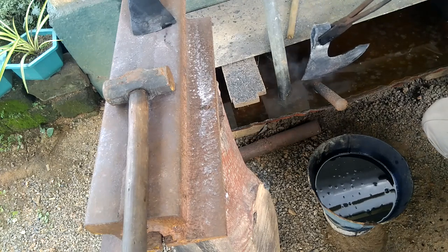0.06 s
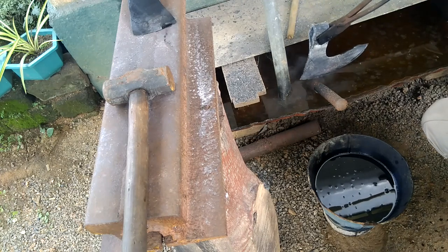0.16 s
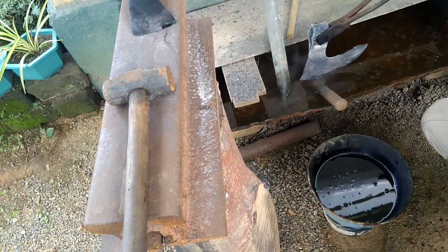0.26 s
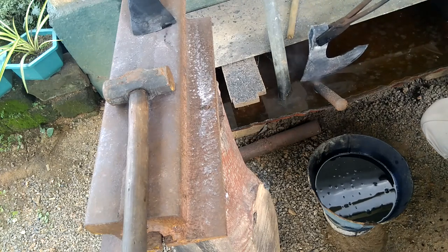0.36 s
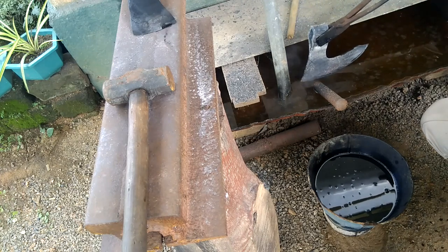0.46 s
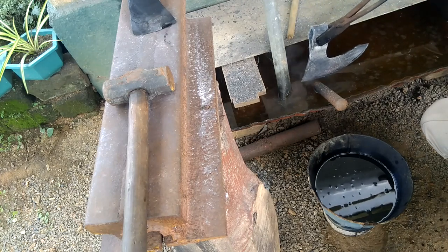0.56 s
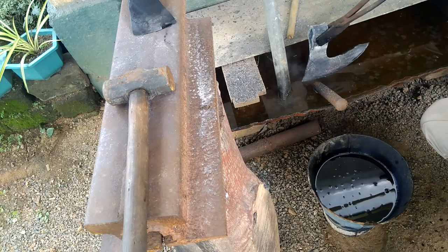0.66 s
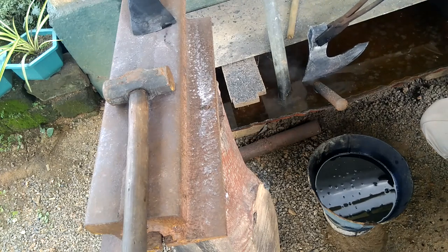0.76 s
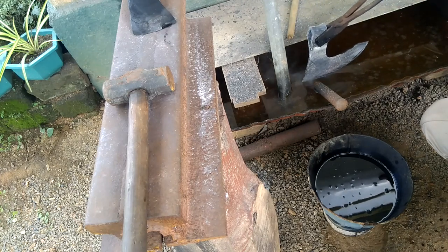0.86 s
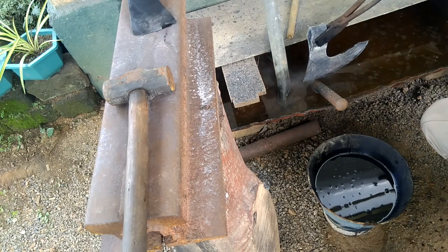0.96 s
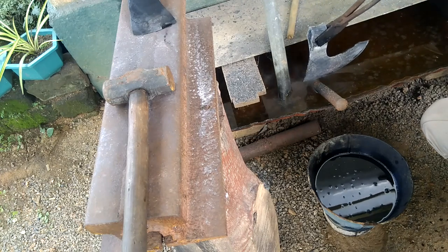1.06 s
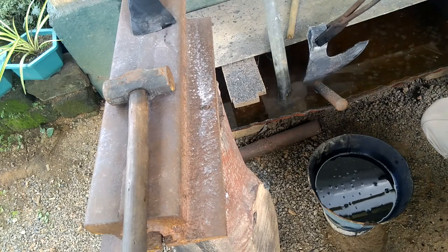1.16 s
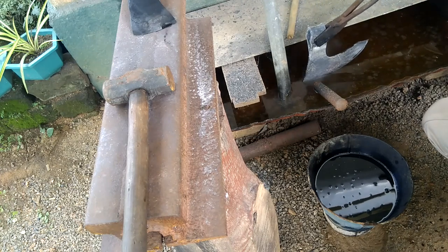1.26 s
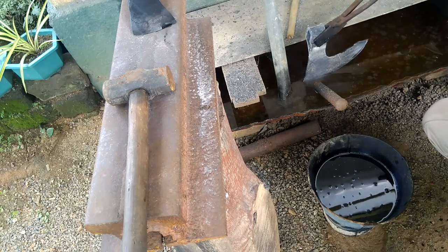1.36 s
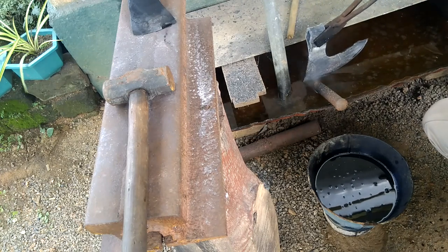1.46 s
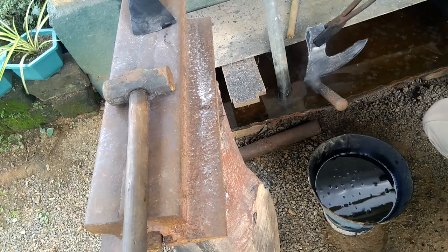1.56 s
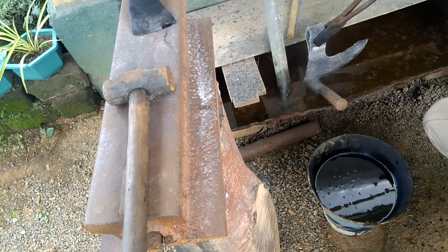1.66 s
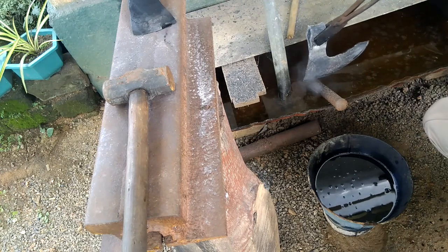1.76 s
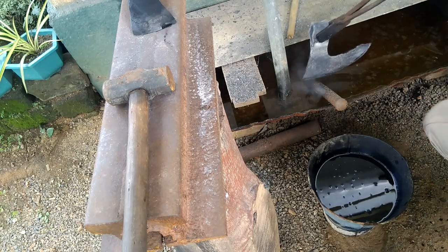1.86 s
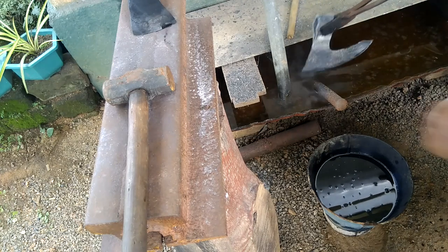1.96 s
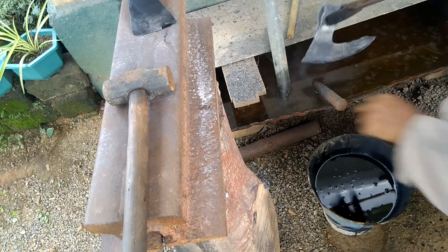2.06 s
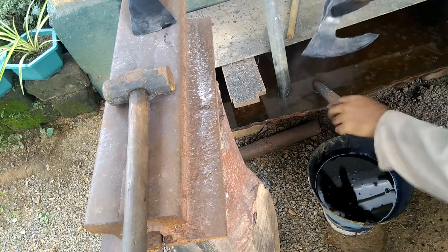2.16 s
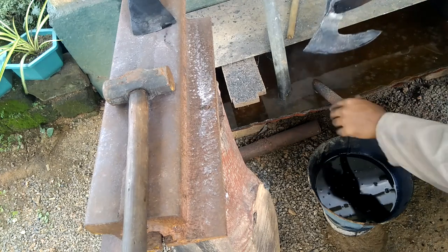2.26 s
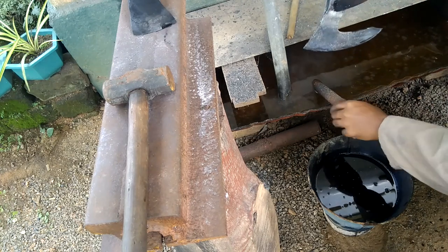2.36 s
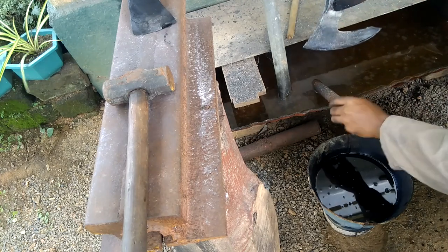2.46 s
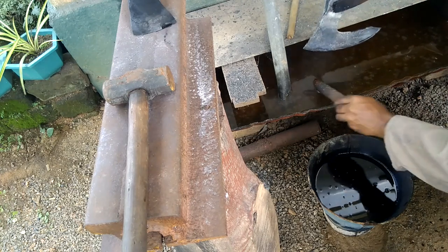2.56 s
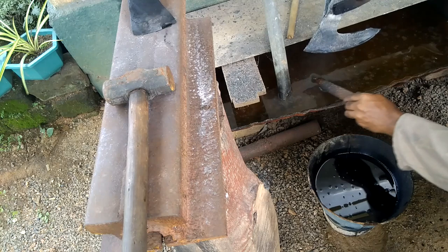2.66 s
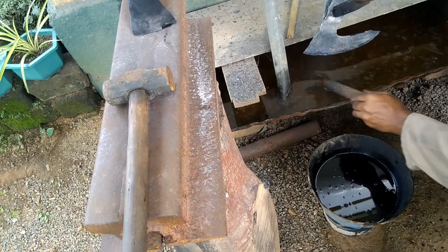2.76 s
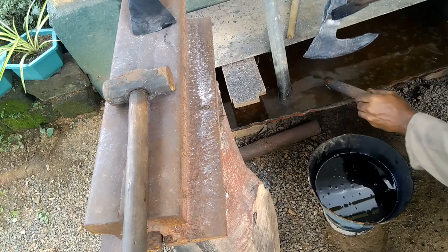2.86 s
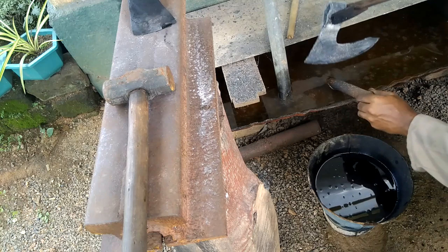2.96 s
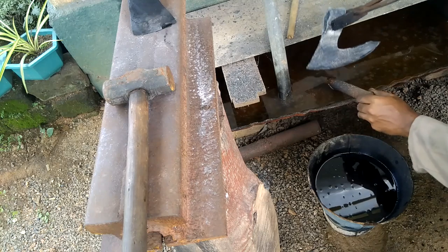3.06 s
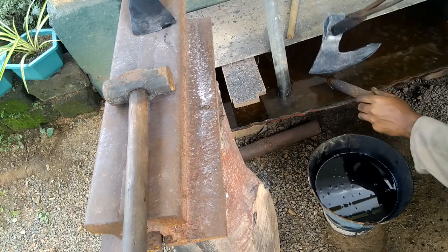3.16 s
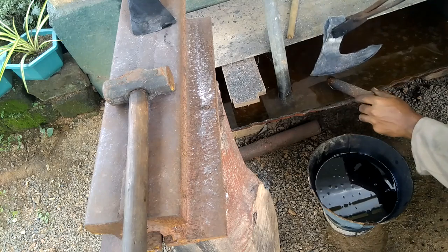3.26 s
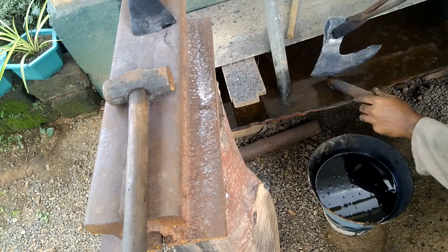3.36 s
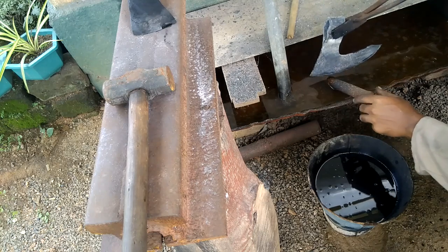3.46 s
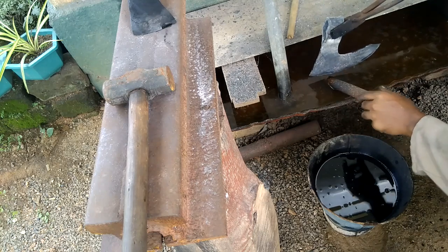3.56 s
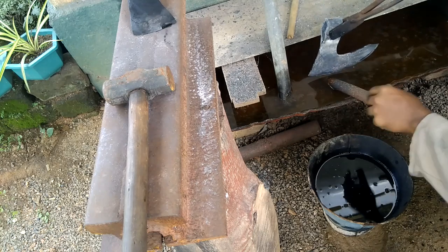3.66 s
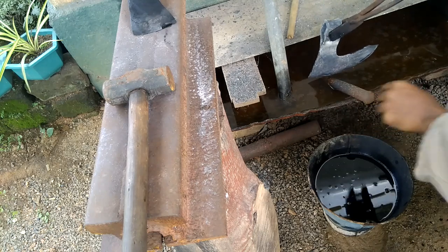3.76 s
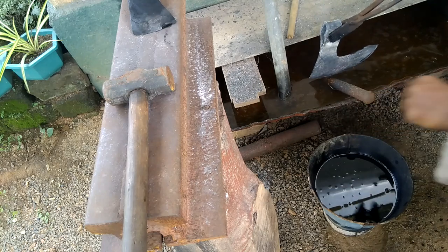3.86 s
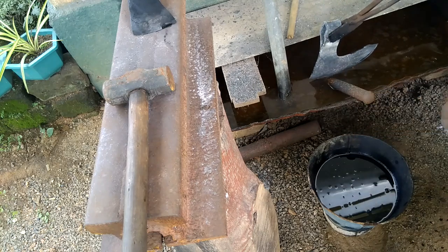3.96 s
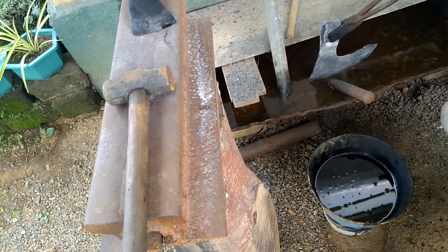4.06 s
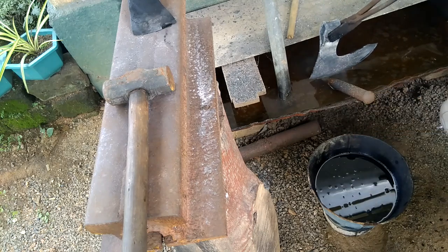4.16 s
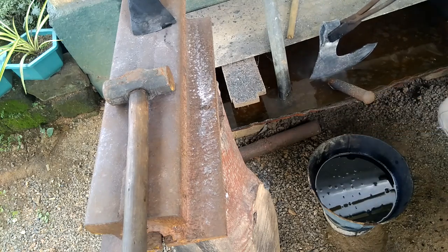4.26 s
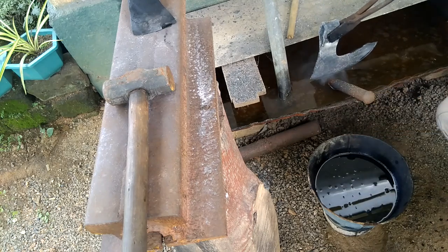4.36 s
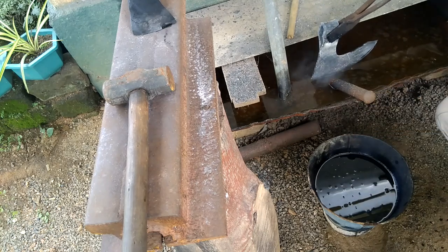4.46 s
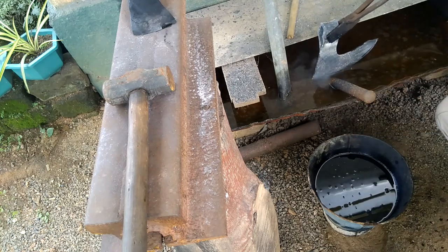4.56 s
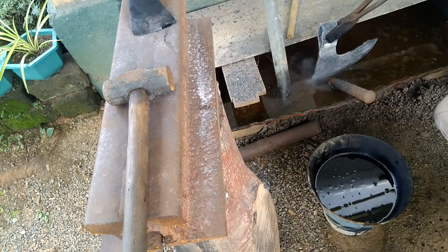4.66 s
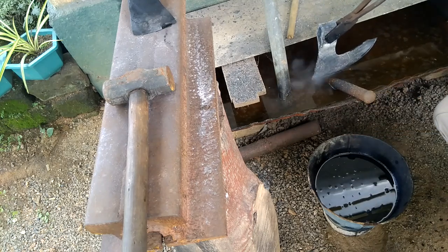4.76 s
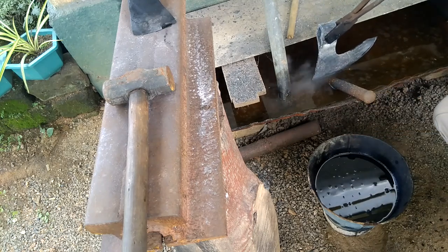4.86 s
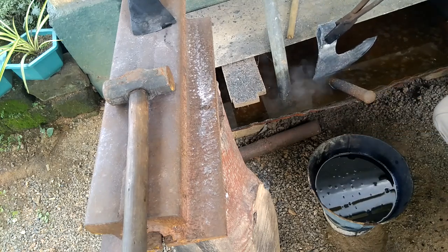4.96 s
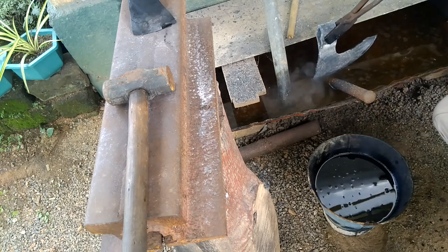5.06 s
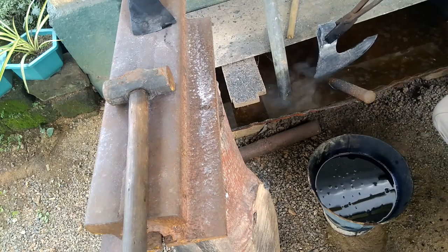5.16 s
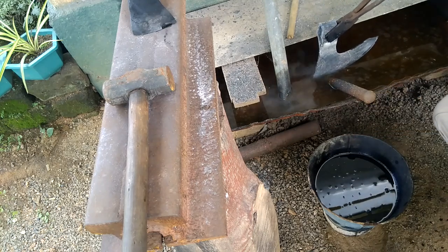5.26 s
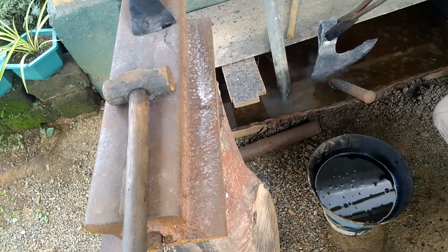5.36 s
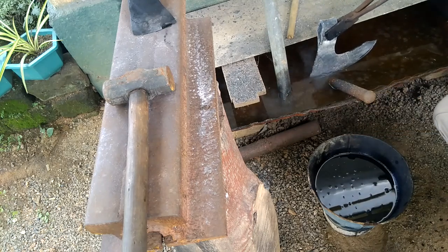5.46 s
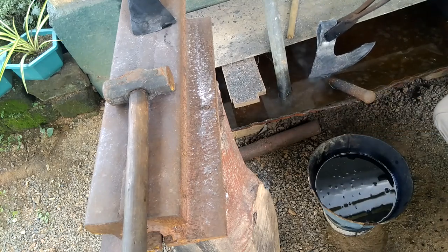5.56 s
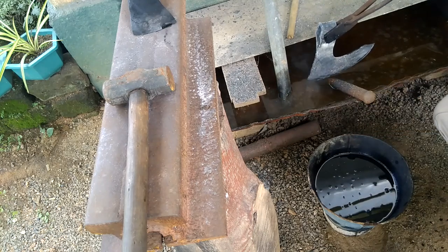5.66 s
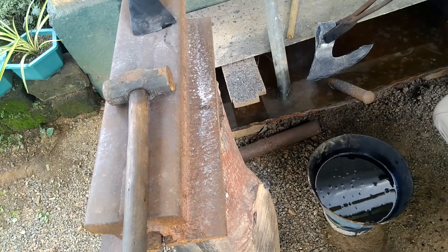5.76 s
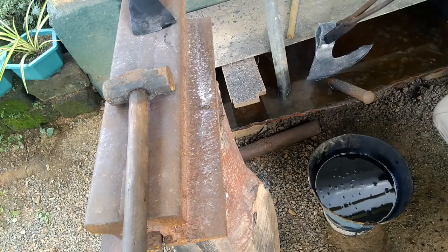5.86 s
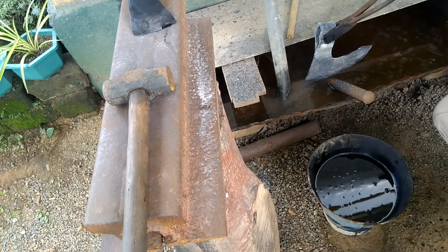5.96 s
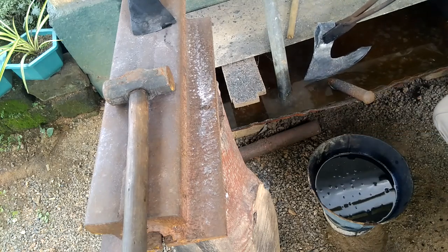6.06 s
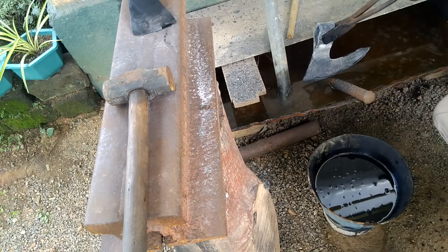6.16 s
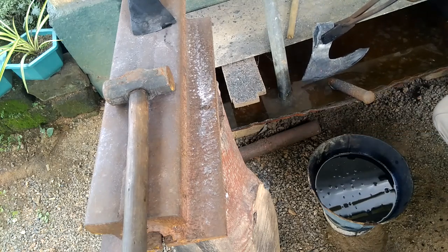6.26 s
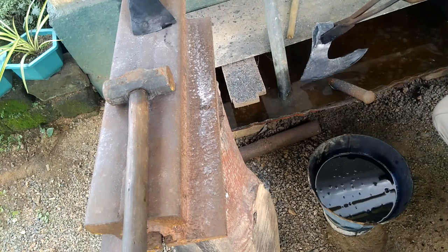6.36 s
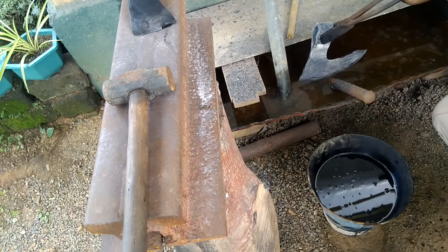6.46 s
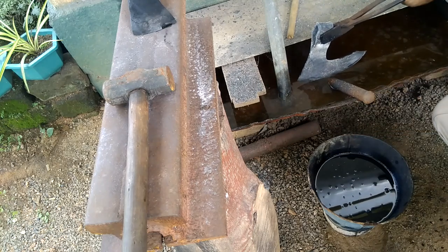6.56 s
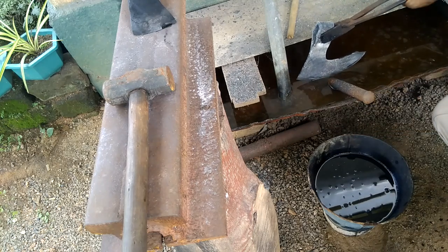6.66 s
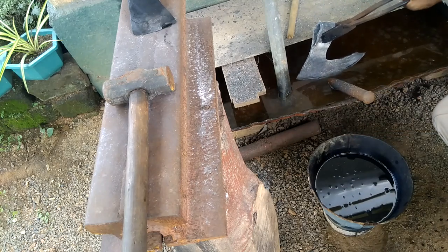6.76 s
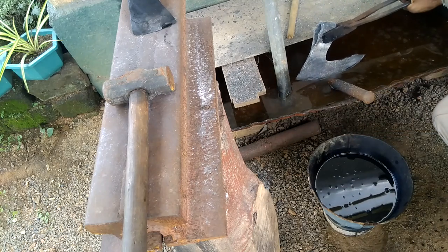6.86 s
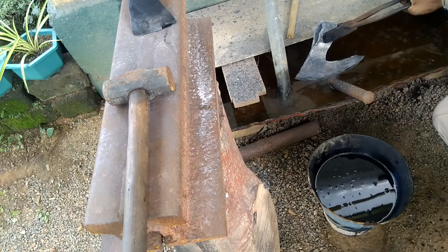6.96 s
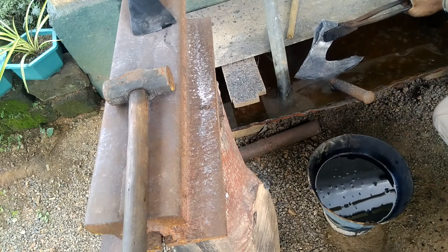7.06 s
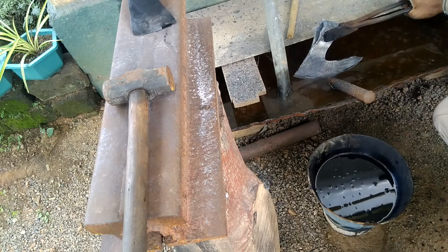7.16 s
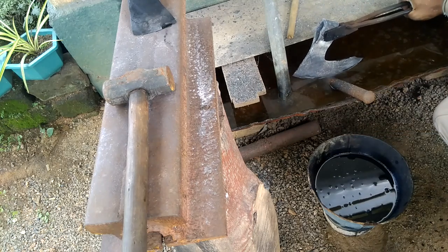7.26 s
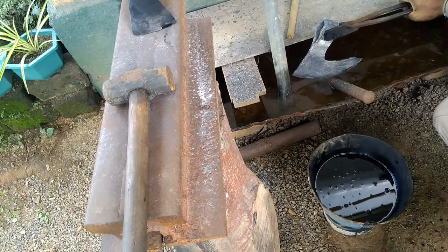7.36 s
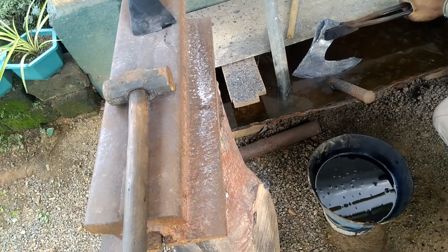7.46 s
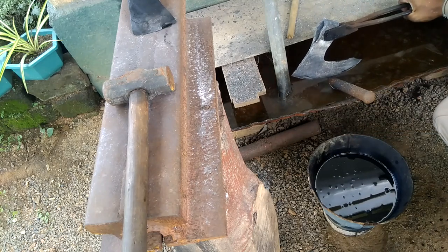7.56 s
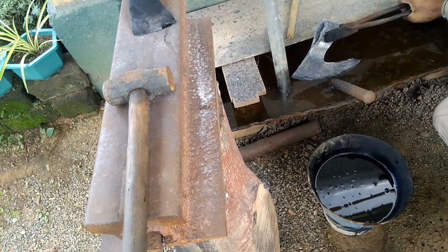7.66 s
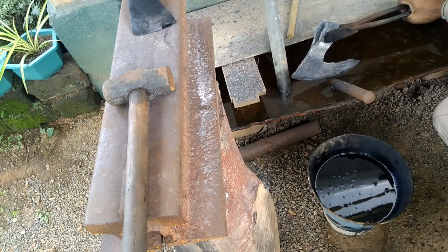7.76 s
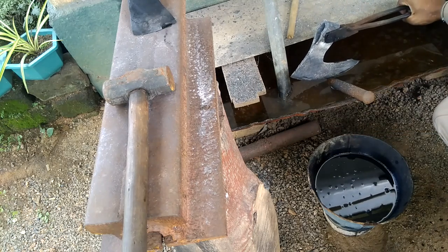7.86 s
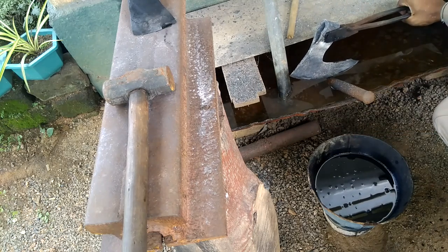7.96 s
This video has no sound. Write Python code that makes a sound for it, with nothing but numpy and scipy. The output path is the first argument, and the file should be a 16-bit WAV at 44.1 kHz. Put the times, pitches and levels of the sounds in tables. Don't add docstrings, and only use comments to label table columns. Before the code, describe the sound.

Hot steel quenching in water outdoors: bright steam hiss over bubbling, a short juddering drag, ticking drops, renewed sizzling, and low wind thuds on the microphone.

```python
import sys
import numpy as np
from scipy import signal
from scipy.fft import rfft, irfft, dct, next_fast_len
from scipy.io import wavfile
from scipy.ndimage import uniform_filter1d, minimum_filter1d, map_coordinates

SR = 44100
rng = np.random.default_rng(int(sys.argv[2]) if len(sys.argv) > 2 else 0)


def convert_level_to_amplitude(level_db):
    exponent = np.asarray(level_db, float) / 20
    return 10 ** exponent


def master(y):
    cut = np.clip(np.atleast_2d(y).T, -1, 1)
    pcm = np.round(cut * 32767)
    wavfile.write(sys.argv[1], SR, pcm.astype(np.int16))


N = 353241


def unit(x):
    return x / np.sqrt(np.mean(x ** 2) + 1e-20)


def curves(rows):
    seconds, *columns = np.transpose(rows)
    return [np.interp(np.arange(N) / SR, seconds, column) for column in columns]


def wobble(rate):
    knots = rng.standard_normal(int(N * rate / SR) + 4)
    return map_coordinates(knots, [np.arange(N) * rate / SR])


def summed(*db):
    return 10 * np.log10(sum(convert_level_to_amplitude(d) ** 2 for d in db) + 1e-12)


def swells(rows, rise_s):
    t = np.arange(0, N, 160) / SR
    levels = []
    for s, db, t60 in rows:
        rise_db = 20 * np.log10(np.clip((t - s) / rise_s, 1e-5, 1))
        levels.append(db - 60 * np.clip(t - s, 0, None) / t60 + rise_db)
    return np.interp(np.arange(N) / SR, t, summed(*levels))


def filtered(x, response):
    m = next_fast_len(N + SR // 2)
    return irfft(rfft(x, m) * response(np.fft.rfftfreq(m, 1 / SR)), m)[:N]


def colour(points):
    f, db = np.transpose(points)
    return lambda hz: convert_level_to_amplitude(np.interp(np.log(hz + 1), np.log(f + 1), db, -120, -120))


def resonances(peaks):
    def response(f):
        total = 0
        for k, (centre, width, db) in enumerate(peaks):
            mode = 1j * f * width / (centre * centre - f * f + 1j * f * width)
            total = total + (-1) ** k * convert_level_to_amplitude(db) * mode
        return total
    return response


def rush(response, patchy_db, streak_db, spit_db):
    grains = (rng.random(N) < 1500 / SR) * rng.standard_normal(N)
    z = signal.stft(rng.standard_normal(N) + convert_level_to_amplitude(spit_db) * unit(grains), nperseg=1024)[2]

    def field(tall, long):
        smeared = uniform_filter1d(rng.standard_normal(z.shape), tall, 0)
        return unit(uniform_filter1d(smeared, long, 1))

    gain = convert_level_to_amplitude(patchy_db * field(14, 3) + streak_db * field(2, 14))
    return unit(filtered(signal.istft(z * gain, nperseg=1024)[1][:N], response))


# delay in ms, share of the direct sound, dull above in Hz.
ECHOES = [(1.21, -0.35, 1500), (1.803, 0.06, 20000), (1.859, -0.09, 8400), (2.049, 0.05, 20000),
          (2.161, -0.03, 20000), (2.686, 0.31, 1500), (3.791, -0.26, 1500), (5.612, 0.25, 2400),
          (6.09, 0.08, 8800), (6.275, 0.19, 5800), (6.429, 0.1, 6400), (6.989, -0.35, 1800)]


def nearby(hz):
    total = 1
    for ms, share, dull_hz in ECHOES:
        total = total + share * np.exp(-2j * np.pi * hz * ms / 1000) / (1 + (hz / dull_hz) ** 2)
    return total


# time in seconds, steam level in dB, depth in the water as dB of stirring.
DIPS = [
    [(0.0, -35.5, 2.5), (0.7, -34, 0), (1.2, -32, -5), (1.75, -34, -3), (1.9, -31.5, -5.5),
     (2.05, -49, 2.5), (2.45, -98, 1)],
    [(3.7, -69, -11), (3.81, -62, -37), (3.835, -42, -24), (3.87, -36, -22), (3.95, -32.5, -10),
     (4.5, -32, -2), (5.04, -33, -1), (5.38, -29, -6), (5.6, -43.5, 5)],
    [(5.8, -45, 2.5), (6.02, -40.5, 1), (6.49, -38, -2.5), (6.72, -33.5, -5.5), (7.12, -37.5, -5.5),
     (7.27, -31.5, -13), (7.49, -35.5, -8), (7.79, -48.5, -3.5), (8.01, -46.5, -5)],
]
# start in seconds, level in dB, t60 in seconds.
SPITS = [
    (2.8, -35.5, 0.21),
    (3.42, -59.5, 0.95),
    (3.7, -59, 1),
]
# frequency in Hz, level in dB per Hz.
SIZZLE = [(3000, -62), (3450, -3), (5100, -0.5), (7000, -3), (9500, -4.5), (13400, -3.5), (15200, -6),
          (16000, -9)]
# frequency in Hz, level in dB per Hz.
BOIL = [(600, -60), (970, -16), (1040, -3), (1500, -1.5), (2200, 0), (3300, 1), (3600, -8), (4200, -45)]
# centre in Hz, width in Hz, level in dB.
BLADE = [(1150, 70, -8), (1440, 70, -12), (1570, 50, -8), (1960, 60, -11), (2230, 150, -7), (2830, 40, -5),
         (3030, 60, -4), (3270, 50, -8)]
# time in seconds, share of the boil from 0 to 1.
POCKETS = [
    (7.65, .01),
    (7.73, .2),
    (7.76, .48),
    (8.01, .48),
]


def steam():
    lift_s, surge_s, surge_half_s = 1.936, 5.26, 0.14
    dip_db, depth_db = curves(np.vstack(DIPS))
    t = np.arange(N) / SR
    since = t - lift_s
    drying_db = np.where(since > 0, -45 - 10.5 * since - 2.5 * since ** 2, -120)
    spray_db = curves([(0, -120)] + KNOCKS + [(3.3, -120)])[0] - 22
    sizzle_db = summed(dip_db, drying_db, spray_db, swells(SPITS, rise_s=0.066))
    surge_db = 3.5 * np.exp(-((t - surge_s) / surge_half_s) ** 2)
    boil_db = -6 + 0.32 * depth_db + surge_db
    share = np.clip(curves(POCKETS)[0], 0, 1)
    sizzle = rush(colour(SIZZLE), patchy_db=1.1, streak_db=1.5, spit_db=-11)
    boil = rush(colour(BOIL), patchy_db=0.5, streak_db=1.8, spit_db=-13)
    whistle = rush(lambda hz: resonances(BLADE)(hz) ** 2, patchy_db=1.1, streak_db=1.2, spit_db=-20)
    boil = np.sqrt(1 - share) * boil + np.sqrt(share) * convert_level_to_amplitude(5.5) * whistle
    level = convert_level_to_amplitude(sizzle_db + 0.21 * wobble(13) + 0.77 * wobble(5))
    film = level * (sizzle + convert_level_to_amplitude(boil_db + 0.5 * wobble(8)) * boil)
    return convert_level_to_amplitude(1.5) * filtered(film, nearby)


# time in seconds, pitch in Hz, level in dB.
PIPING = [(7.7, 2960, -72), (7.75, 3000, -52), (7.79, 2990, -56), (7.84, 2970, -56), (7.89, 3030, -46),
          (7.93, 2970, -53), (7.975, 3060, -53), (8.01, 3050, -57)]


def piping():
    hz, db = curves(PIPING)
    started = np.arange(N) > PIPING[0][0] * SR
    level = convert_level_to_amplitude(db + 3 + 1.8 * wobble(40))
    return level * started * np.sin(2 * np.pi * np.cumsum(hz + 16 * wobble(60)) / SR)


# start in seconds, peak level in dB, pitch in Hz.
GURGLES = [(0.059, -32.5, 580), (1.059, -39, 400), (2.235, -53, 172), (2.264, -42, 568), (3.509, -41, 220),
           (3.905, -35, 182), (4.279, -40, 482), (5.658, -40.5, 600), (5.929, -47, 710), (6.997, -61, 174),
           (7.512, -47, 488), (3.526, -44, 350), (3.911, -41, 332), (3.97, -45.5, 380), (5.74, -39, 200),
           (5.045, -34, 190), (4.5, -41, 200), (5.085, -46, 180), (6.555, -41, 243), (6.81, -40, 350),
           (6.845, -41, 278), (7.37, -45.5, 200), (2.09, -52, 297), (1.66, -46, 330), (6.774, -40, 199),
           (7.3, -43.5, 220), (2.46, -52, 360), (2.31, -41, 560), (2.37, -44, 580), (2.43, -47, 600),
           (3.515, -50, 650), (6.9, -45, 330), (7.1, -51, 340), (7.199, -60, 270), (5.42, -39, 490)]
# start in seconds, level in dB, t60 in seconds.
SPLASHES = [(2.0, -52, 0.51), (2.225, -58.5, 2.3), (3.15, -63, 0.91), (3.505, -56, 0.46), (6.8, -56, 0.82),
            (3.895, -56, 0.35), (5.65, -59, 0.32), (7.5, -50, .2)]
# time in seconds, level in dB, dB by which large bubbles rise and small ones
CHURN = [(0, 1.5, 3.5), (.5, 1, 1), (1.0, 4, 4), (1.4, 4, 1), (1.85, -2, -3), (2.3, 9, 0), (3.5, 4, 1),
         (4.0, 2, 1.5), (4.4, 2.5, 2.5), (4.9, 1.5, 1), (5.4, -0.5, -1.5), (5.9, -0.5, 1.5),
         (6.25, -10, -6), (6.55, -9, -10), (6.9, 4.5, 4.5), (7.3, -1, 1.5), (7.6, -2, -3),
         (8.01, -9.5, -11)]
# frequency in Hz, level in dB per Hz.
WATER = [(140, -34), (230, -8), (320, -10), (470, -4), (550, -2.5), (750, -4), (980, -4), (1150, -34)]
# centre in Hz, half width in Hz, gain in dB.
NULLS = [(310, 45, -7), (670, 25, -4), (835, 22, -5)]


def slosh():
    bubbles, t = np.zeros(N + SR), np.arange(SR // 8) / SR
    for s, db, hz in GURGLES:
        swell = convert_level_to_amplitude(db + 4.0 - 60 * t / 0.072) * (1 - np.exp(-t / 0.0094))
        bubbles[round(s * SR):][:len(t)] += swell * np.sin(2 * np.pi * hz * t * (1 + 0.86 * t))
    dip_db, depth_db = curves(np.vstack(DIPS))
    churn_db, large_db = curves(CHURN)
    stirring_db = dip_db + depth_db - 16 + churn_db + 1.23 * wobble(12)
    stir_db = summed(stirring_db, swells(SPLASHES, rise_s=0.017))

    def hollow(hz):
        dents_db = sum(db * np.exp(-((hz - c) / w) ** 2) for c, w, db in NULLS)
        return colour(WATER)(hz) * convert_level_to_amplitude(dents_db)

    water = rush(hollow, patchy_db=-0.5, streak_db=3.2, spit_db=-5)
    large = filtered(water, lambda hz: 1 / (1 + (hz / 452) ** 8))
    stirred = convert_level_to_amplitude(large_db) * large + convert_level_to_amplitude(-large_db) * (water - large)
    return convert_level_to_amplitude(stir_db) * stirred + bubbles[:N]


# time in seconds, knock level in dB.
KNOCKS = [(2.579, -60), (2.623, -35.5), (2.705, -28), (2.735, -34.5), (2.78, -26.5), (2.8, -31),
          (3.0, -33.5), (3.1, -47.5), (3.22, -60)]
# time in seconds, slip rate in Hz.
SLIPS = [(2.6, 188), (2.8, 182.7), (2.9, 170.6), (3.1, 172.8)]
# centre in Hz, width in Hz, level in dB.
TROUGH = [(188, 53, 5.5), (374, 63, 6.5), (547, 12.5, 7), (915, 100, -28), (1195, 89, -10.5),
          (2210, 94, -36), (2860, 36, -24)]
# frequency in Hz, level in dB per Hz.
GRIT = [(300, -25), (600, 0), (1200, -4), (2200, -8), (3200, -14.5), (5000, -17.5), (7000, -42)]
# start in seconds, level in dB, t60 in seconds.
SCUFFS = [(2.25, -48, 0.22), (2.3, -53, 0.48), (2.54, -53, 0.13), (3.07, -60, 0.23), (3.63, -57, 0.66),
          (3.47, -65, 0.28)]


def drag():
    knock_db, = curves(KNOCKS)
    turns = np.cumsum(curves(SLIPS)[0] * (1 + 0.037 * wobble(60))) / SR
    slipping = np.diff(np.floor(turns), prepend=0) > 0
    slips = slipping * convert_level_to_amplitude(4.6 * rng.standard_normal(N) + 1.9 * wobble(24.9))
    body = unit(filtered(unit(slips) + 1.64 * rng.standard_normal(N), resonances(TROUGH)))
    grit = rush(colour(GRIT), patchy_db=1.5, streak_db=3, spit_db=-5.0)
    t = np.arange(N) / SR
    start_s, stop_s = KNOCKS[0][0], KNOCKS[-1][0]
    moving = np.clip(np.minimum(t - start_s, stop_s - t) / 0.033, 0, 1)
    gathers = np.clip((t - start_s) / 0.093, 0, 1)
    thins = np.clip((stop_s - .01 - t) / 0.26, 0, 1)
    grit_db = -41.5 + 3.5 + 0.8 * (knock_db + 29.5)
    brush = unit(filtered(grit, lambda hz: hz / (hz + 3000) / (1 + (hz / 3300) ** 4)))
    scuffs = convert_level_to_amplitude(swells(SCUFFS, rise_s=0.023)) * brush
    return moving * (convert_level_to_amplitude(knock_db - 2.5) * body + convert_level_to_amplitude(grit_db) * thins * gathers * grit) + scuffs


# start in seconds, peak level in dB,
# pitch in Hz.
DROPS = [(2.235, -38, 2840), (2.263, -25.5, 1140), (2.264, -32, 1550), (2.311, -28, 1170),
         (2.324, -31, 4320), (2.345, -33, 6080), (2.47, -37, 6590), (3.189, -35, 1155), (3.192, -49, 1520),
         (3.191, -43, 1950), (3.434, -43.5, 6200), (3.471, -39.5, 6250), (3.529, -50, 800),
         (2.825, -32, 6200), (2.834, -36, 3250), (2.555, -39, 2750), (3.64, -47, 2600), (3.66, -47, 2900),
         (3.635, -50, 3600)]


def drops():
    out, t = np.zeros(N + SR), np.arange(SR // 12) / SR
    for s, db, hz in DROPS:
        crack = convert_level_to_amplitude(-60 * t / 0.0034) * rng.standard_normal(len(t)) * np.clip(hz / 4000, .2, 1)
        spray = convert_level_to_amplitude(-11.0 - 60 * t / 0.06) * rng.standard_normal(len(t)) * np.clip(hz / 4000, 0, 1)
        jitter = np.cumsum(0.19 * rng.standard_normal(len(t)))
        plink = convert_level_to_amplitude(-15.0 - 60 * t / 0.1) * np.sin(2 * np.pi * hz * t + jitter)
        out[round(s * SR):][:len(t)] += convert_level_to_amplitude(db + 0.5) * (crack + spray + plink)
    return filtered(out[:N], lambda hz: hz > 600)


# start in seconds, peak level in dB, swing in Hz, wake relative to the peak in dB.
PUFFS = [(0.212, -27, 84.4, -33), (0.333, -21.5, 90.5, -35), (0.463, -13, 100, -20),
         (0.743, -18, 111, -15.5), (0.857, -17.5, 79.5, -24), (1.123, -25.5, 80, -45),
         (1.248, -22, 89, -31), (1.654, -19, 100, -30), (1.71, -19, 93.5, -32), (1.94, -15, 129, -27),
         (2.302, -29.5, 69.6, -17.5), (2.395, -29.5, 72.7, -27), (2.517, -39, 65, -22),
         (2.98, -33.5, 100, -7), (3.224, -25, 103, -14), (3.269, -25, 62, -27), (3.479, -29.5, 75.4, -14),
         (3.549, -30.5, 70, -11), (4.062, -28, 88, -29), (4.932, -22.5, 100, -17), (5.041, -25, 102, -9),
         (5.083, -23, 90, -30), (5.232, -19, 144, -21), (5.25, -25, 100, -20), (5.477, -16, 121, -23.5),
         (6.267, -24, 94, -19), (6.395, -20, 82, -22), (6.42, -23.5, 80, -26), (6.549, -22, 136, -20),
         (6.586, -30, 91, -23), (6.704, -21.5, 100, -12), (6.838, -23, 131, -12.5), (6.983, -23, 96, -16),
         (7.675, -30.5, 79, -25), (7.792, -22.5, 94, -36)]
# start in seconds, peak level in dB, swing in Hz.
FLAPS = [(0.426, -19, 107), (.53, -23, 86), (.56, -25, 78), (.605, -25, 107), (.784, -18.5, 96),
         (1.434, -26.5, 109), (1.601, -26, 118), (1.631, -30, 87), (1.783, -21, 74), (1.886, -23, 105),
         (1.908, -29, 111), (5.183, -24, 70), (5.311, -26, 119), (5.387, -30, 88), (5.729, -31, 134),
         (6.746, -22, 120), (6.78, -22, 110), (6.805, -23, 100), (6.892, -26, 93), (7.756, -27, 115),
         (7.909, -36, 87)]
# start in seconds, level in dB.
EDDIES = [(.41, -32), (.52, -42), (.6, -48), (.785, -35), (1.55, -46), (1.6, -44), (1.78, -43), (1.87, -32),
          (2.1, -47), (2.65, -42), (2.85, -39), (4.42, -44.5), (5.085, -53), (5.18, -36), (5.305, -36),
          (5.39, -41.5), (5.56, -41), (5.72, -38), (6.04, -42.5), (6.42, -44), (6.74, -28.5), (6.78, -27.5),
          (6.89, -44), (7.08, -48.5), (7.92, -64.5)]
# time in seconds, buffet level in dB.
GUSTS = [(0.0, -49.5), (0.6, -37.5), (1.15, -53.5), (1.7, -39), (1.95, -41), (2.05, -56.5), (3.55, -49.5),
         (3.77, -61.5), (4.05, -54.5), (4.6, -58.5), (4.9, -59), (5.2, -43.5), (5.9, -52), (6.2, -59),
         (6.8, -40), (7.25, -57), (7.55, -62), (7.75, -44)]
# frequency in Hz, level in dB per Hz.
BUFFET = [(12, -57), (20, -38), (61, 2), (90, -3), (160, -9), (264, -26), (520, -37), (880, -120)]


def wind():
    rumble = rush(colour(BUFFET), patchy_db=-3.5, streak_db=3.5, spit_db=-33.0)
    even = rumble / np.sqrt(np.abs(uniform_filter1d(rumble ** 2, size=2600)) + 0.038)
    pushes, t = np.zeros(N + SR), np.arange(SR // 8) / SR - .014
    for s, db, hz, *_ in PUFFS + FLAPS:
        swing = np.exp(-np.where(t < 0, (t / 0.0032) ** 2, t / 0.0098))
        turn = 2 * np.pi * hz * t * (1 - 2.0 * t)
        push = np.cos(turn) + 0.054 * swing ** 2 * np.cos(2 * turn)
        pushes[round(s * SR):][:len(t)] += convert_level_to_amplitude(db - 1.0) * swing * push
    wake_t60_s = 0.38
    wakes = [(s, db + wake_db + 5.0, wake_t60_s) for s, db, _, wake_db in PUFFS]
    wakes += [(s, db, wake_t60_s) for s, db in EDDIES]
    gust_db = curves(GUSTS)[0] + 3.1 * wobble(9) + 3.2 * wobble(30)
    buffet_db = summed(gust_db, swells(wakes, rise_s=0.0095))
    thuds = filtered(pushes[:N], lambda hz: hz ** 2 / (hz ** 2 + 55 ** 2) / (1 + (hz / 270) ** 4))
    return convert_level_to_amplitude(buffet_db) * even + thuds


# frequency in Hz, level in dB per Hz.
YARD = [(150, -24), (300, 6.5), (1000, 3.5), (4000, -1), (9000, -7), (14000, -30), (16000, -42)]


def yard():
    return convert_level_to_amplitude(-64.5) * rush(colour(YARD), patchy_db=-3.0, streak_db=1.5, spit_db=-24.0)


def scene():
    hush = yard()
    return np.tile(steam() + slosh() + drag() + wind() + drops() + piping() + hush, (2, 1))


# frequency in Hz, level in dB.
HUSH = [(150, -120), (250, -90), (900, -92), (1500, -98), (5000, -97), (11000, -96), (13500, -92),
        (16000, -86)]
# centre in seconds, half length in seconds, centre in Hz, half width in Hz,
# gain in dB.
BAND_DIPS = [(2.45, .04, 3040, 110, -24), (2.495, .045, 3110, 120, -34), (2.54, .045, 800, 220, -14),
             (3.825, .025, 1200, 500, -14), (3.86, .04, 700, 220, -8), (2.49, .09, 1500, 700, -8),
             (2.46, .06, 3700, 400, -8), (7.82, .04, 3430, 90, -14), (7.97, .03, 3430, 80, -12),
             (7.83, .08, 1330, 50, -10), (7.8, .08, 920, 60, -8), (7.84, .06, 2640, 90, -10),
             (7.68, .05, 930, 60, -10), (6.4, .15, 540, 130, -10), (4.22, .14, 280, 70, -13),
             (2.5, .08, 2050, 220, -10), (7.72, .1, 470, 80, -9), (7.95, .08, 600, 120, -7),
             (3.97, .08, 560, 90, -8), (5.93, .06, 920, 60, -9), (3.25, .1, 10500, 2500, -5),
             (7.9, .12, 350, 90, -8), (7.25, .2, 570, 70, -6)]


def suppress(x, memory_db, deepest_db):
    hz, t, z = signal.stft(x, SR, nperseg=1024)
    power = uniform_filter1d(uniform_filter1d(np.abs(z) ** 2, size=5, axis=1), size=2, axis=0)
    past = uniform_filter1d(signal.lfilter([.015], [1, -.985], power), size=5, axis=0)
    memory = convert_level_to_amplitude(2 * memory_db) * ((hz > 200) / (1 + (hz / 5000) ** 2))[:, None]
    expected = colour(HUSH)(hz)[:, None] ** 2 + memory * past
    deepest = convert_level_to_amplitude(deepest_db * (1 + (hz > 13600)))[:, None]
    gain = np.clip(1 - expected / (power + 1e-18), deepest, 1)
    for s, half_s, centre_hz, half_hz, db in BAND_DIPS:
        near = np.exp(-((t - s) / half_s) ** 2 - ((hz[:, None] - centre_hz) / half_hz) ** 2)
        gain = gain * convert_level_to_amplitude(db * near)
    return signal.istft(z * gain, SR, nperseg=1024)[1][:N]


# centre in seconds, noise left in dB.
STARVED = [(1.076, -33), (1.103, -32), (1.217, -31), (2.525, -13), (2.728, -32), (3.409, -11), (4.49, -30),
           (5.028, -26), (5.42, -29)]
PINCHED_S = [.241, .812, 1.413, 1.785, 1.906, 1.969, 2.205, 3.065, 3.717, 3.785, 4.316, 4.36, 4.447, 4.781,
             5.059, 5.148, 5.176, 5.317, 5.573, 5.688, 5.764, 5.83, 6.108, 6.961, 7.026, 7.105]


def thin(x, step_db, spare_db, line_db):
    frame, starved_ms, pinched_ms, stagger_ms = 2048, 28, 11, 11
    pad, t = np.pad(x, frame), (np.arange(frame) - frame // 2) / SR
    left, lines = np.ones(len(pad)), np.zeros(len(pad))
    short = [(s, starved_ms, db) for s, db in STARVED] + [(s, pinched_ms, -16) for s in PINCHED_S]
    for s, ms, left_db in short:
        at = round(s * SR) + frame // 2
        here = slice(at, at + frame)
        gate = np.sin(np.pi / 2 * np.clip((ms + 17 - 2000 * np.abs(t)) / 22, 0, 1))
        c = dct(pad[here] * gate, 4, norm="ortho")
        band = np.sqrt(uniform_filter1d(c ** 2, size=75) + 1e-16)
        spared = (band > convert_level_to_amplitude(spare_db) * np.median(band)) | (np.arange(frame) < 14)
        tallest = np.abs(c) >= -minimum_filter1d(-np.abs(c), size=21)
        kept = tallest & (np.abs(c) > convert_level_to_amplitude(step_db) * band) & (band > convert_level_to_amplitude(-8) * np.mean(band))
        left[here] -= gate ** 2 * (1 - convert_level_to_amplitude(2 * left_db))
        lines[here] += gate * dct(c * spared, 4, norm="ortho")
        early = rng.random(frame) < .5
        size = convert_level_to_amplitude(line_db + 1.5 * rng.standard_normal(frame)) * ((starved_ms + 6) / (ms + 6)) ** .35
        for shift, mine in ((-0.75, early), (0.73, ~early)):
            window = np.cos(np.pi / 2 * np.clip((1000 * t - shift * stagger_ms) / starved_ms, -1, 1))
            lines[here] += window * dct(c * size * (kept & ~spared & mine), 4, norm="ortho")
    return (pad * np.sqrt(np.clip(left, 1e-4, 1)) + lines)[frame:-frame]


# centre in seconds, centre in Hz.
SPLIT = [(.334, 9260), (.521, 4950), (1.309, 13740), (1.447, 8950), (1.448, 5720), (1.45, 11750),
         (1.519, 7880), (1.609, 10680), (1.681, 14500), (3.979, 8260), (4.072, 9640), (4.072, 15100),
         (4.212, 6290), (4.212, 15100), (4.223, 8570), (4.653, 15100), (4.663, 12400), (4.978, 9000),
         (5.233, 8260), (6.021, 15100), (6.046, 8960), (6.346, 6930), (6.348, 5120), (6.37, 11020),
         (6.58, 6890), (6.789, 9600), (7.137, 13130), (7.394, 5000)]


def split(x, side_db):
    side, window = np.zeros(N), np.hanning(2048)
    hz = np.fft.rfftfreq(2048, 1 / SR)
    for s, centre_hz in SPLIT:
        at = round(s * SR) - 1024
        size = np.abs(rfft(x[at:at + 2048])) * (np.abs(hz - centre_hz) < 750)
        noise = irfft(size * np.exp(2j * np.pi * rng.random(len(hz))))
        side[at:at + 2048] += np.sqrt(window) * noise
    return np.array([x + convert_level_to_amplitude(side_db) * side, x - convert_level_to_amplitude(side_db) * side])


def roll_off(x):
    return signal.sosfilt(signal.butter(12, 16610, fs=SR, output="sos"), x)


def record(dry):
    limited = filtered(dry[0], lambda hz: hz < 15830)
    clean = suppress(limited, memory_db=-17, deepest_db=-14)
    thinned = thin(clean, step_db=7.5, spare_db=9.5, line_db=9)
    mix = split(thinned, side_db=-4.0)
    return roll_off(mix)


dry = scene()
out = record(dry)
master(out)
```